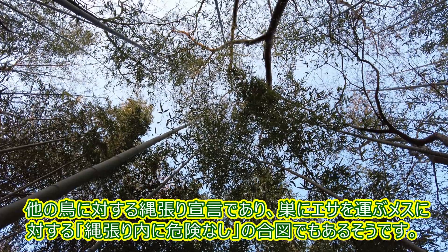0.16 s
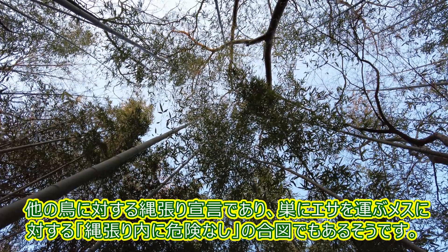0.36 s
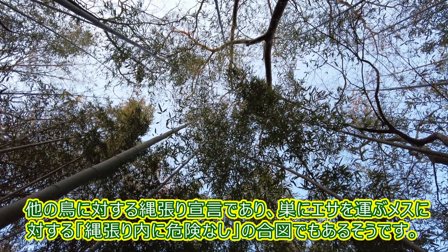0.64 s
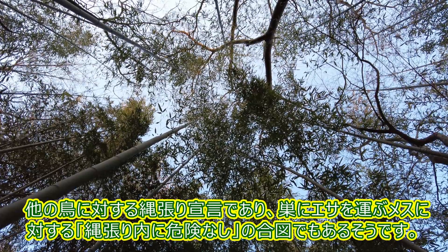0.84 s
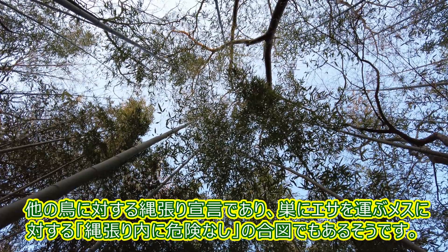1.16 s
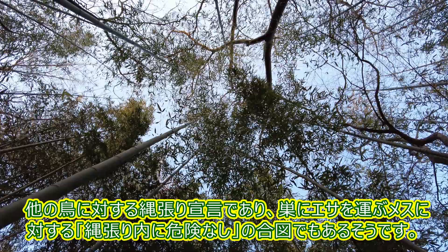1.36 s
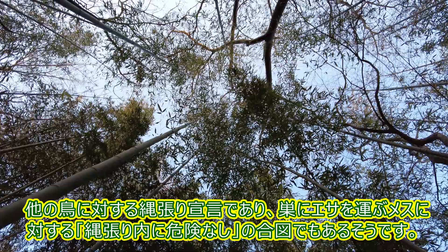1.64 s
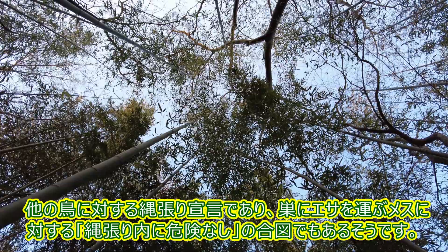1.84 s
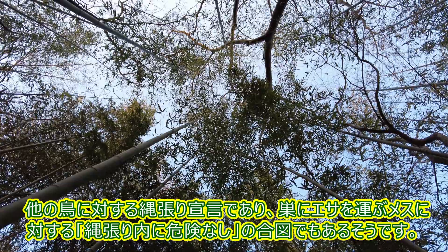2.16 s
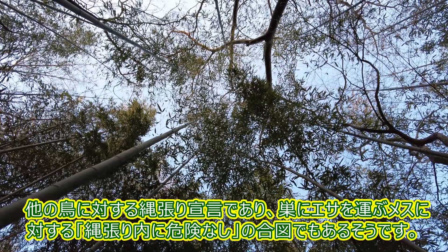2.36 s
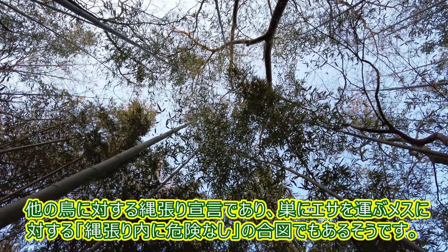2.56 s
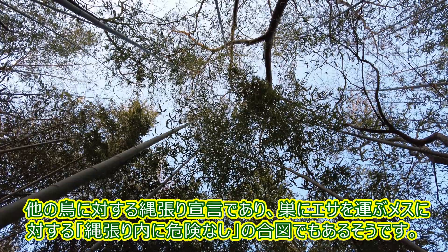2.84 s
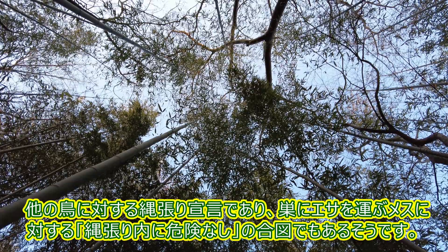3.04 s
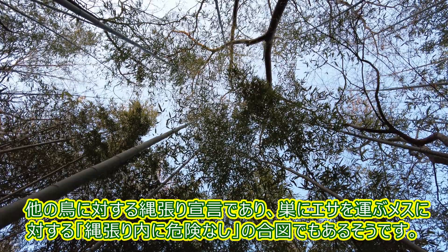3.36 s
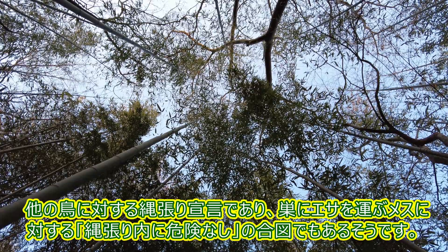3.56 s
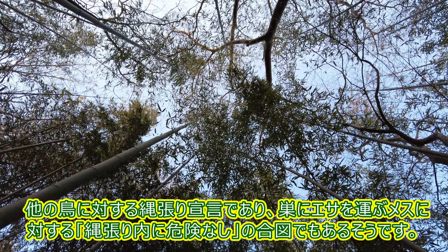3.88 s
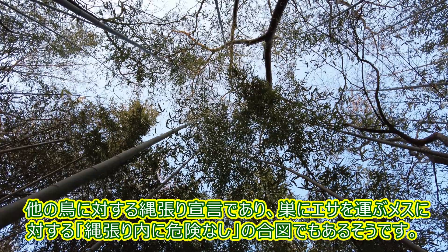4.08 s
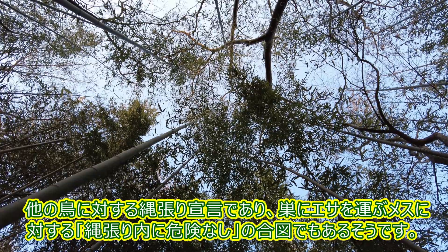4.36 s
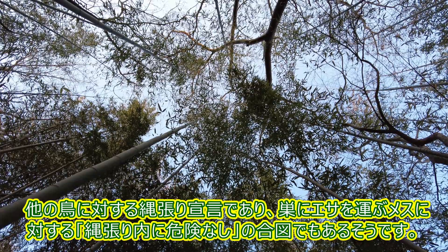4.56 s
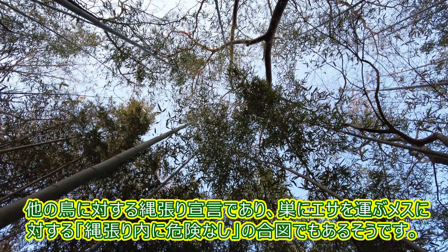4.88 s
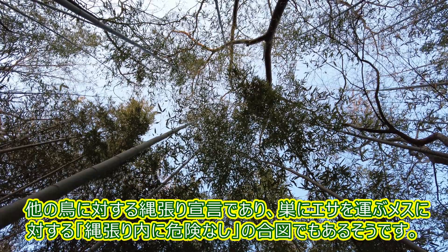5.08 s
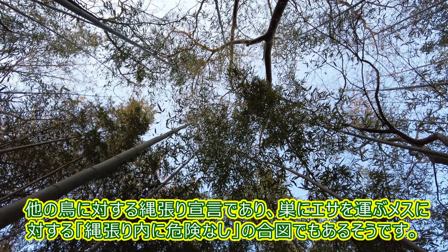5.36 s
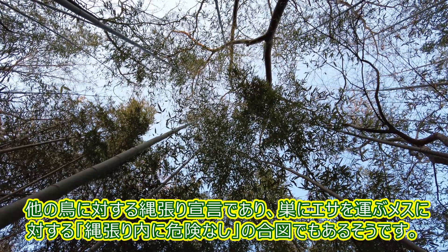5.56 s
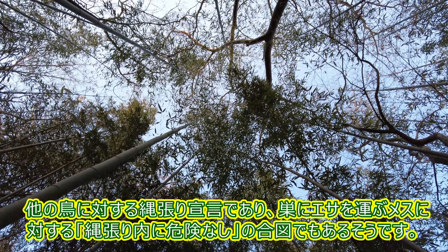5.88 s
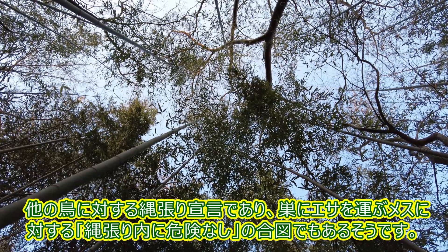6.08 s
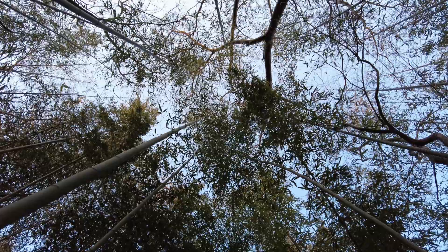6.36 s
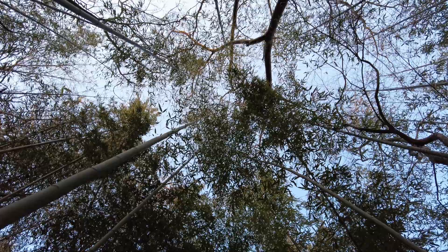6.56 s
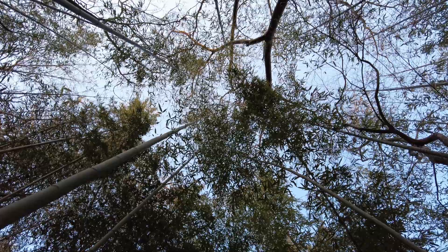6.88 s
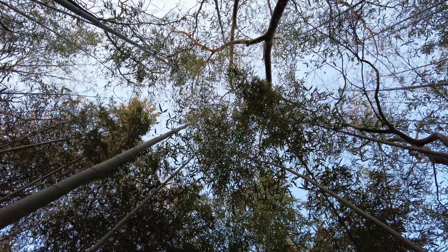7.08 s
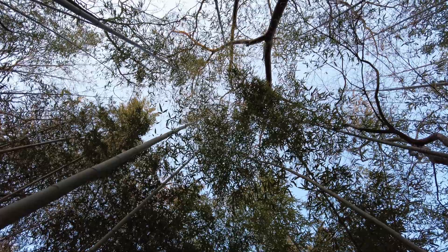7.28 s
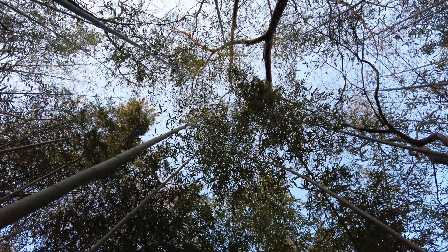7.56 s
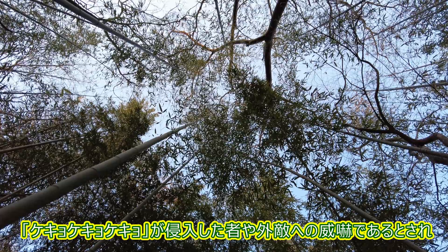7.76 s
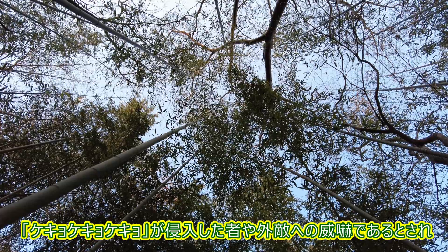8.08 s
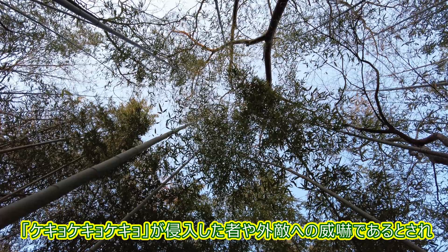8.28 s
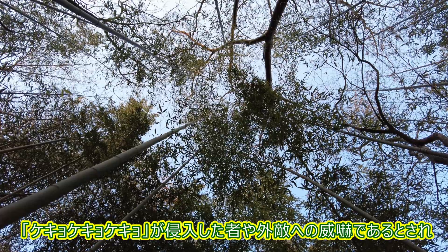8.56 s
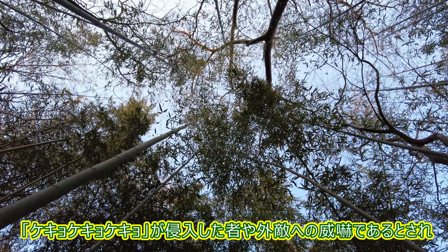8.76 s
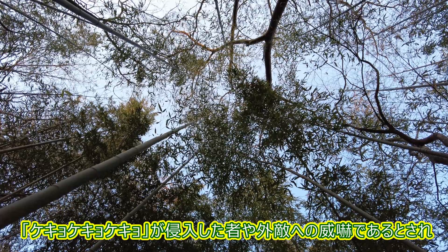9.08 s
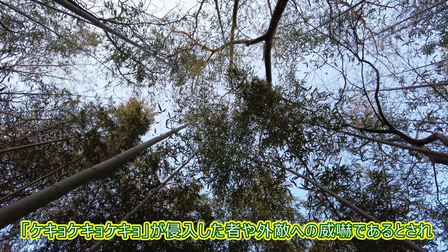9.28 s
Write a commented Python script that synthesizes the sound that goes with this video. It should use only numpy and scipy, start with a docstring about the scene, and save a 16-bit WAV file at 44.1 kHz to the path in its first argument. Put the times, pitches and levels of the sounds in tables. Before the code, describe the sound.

Wind buffets the microphone with a low rumble while leaves rustle softly among bamboo and trees. A faint bird whistles far off and small birds chirp, slightly to the left. A few hollow bamboo knocks follow, the last sharp and loud. Then a songbird gives a wavering whistle that grows louder and breaks into a fast, briefly echoing flourish, leaving light chirps and twitter.

```python
"""Warbler in a breezy bamboo grove

A warbler whistles a long, wavering note and a quick flourish; a second one sings further off.
Small birds chirp in the crowns and hollow stems knock together; the trunks scatter it all into
a short tail. Underneath, wind rumbles on the microphone over a bed of rustling leaves."""
import sys
import numpy as np
from scipy import signal
from scipy.fft import rfft, irfft, next_fast_len
from scipy.io import wavfile
from scipy.ndimage import uniform_filter1d

SR = 44100
rng = np.random.default_rng(int(sys.argv[2]) if len(sys.argv) > 2 else 0)


def waveform_to_disk(signal):
    """Save audio, clipped to [-1, 1], as 16-bit WAV at the path in sys.argv[1]."""
    frames = np.transpose(np.atleast_2d(signal))
    scaled = np.clip(frames, -1, 1) * 32767
    samples = np.round(scaled).astype(np.int16)
    wavfile.write(sys.argv[1], SR, samples)


N = 415863

# the warbler's long note, sinking as it swells: time_s, pitch_hz, level_db
LONG_NOTE = [(3.935, 2017, -53), (4.003, 2010, -49), (4.031, 1928, -47), (4.087, 1979, -37.5),
             (4.151, 1948, -47), (4.167, 1950, -38), (4.201, 1925, -40.5), (4.273, 1864, -46),
             (4.283, 1853, -41), (4.349, 1843, -36), (4.399, 1799, -48), (4.457, 1812, -37),
             (4.469, 1802, -51), (4.483, 1820, -32), (4.491, 1797, -37.5), (4.543, 1762, -30.5),
             (4.559, 1813, -40), (4.601, 1825, -27), (4.671, 1802, -43), (4.715, 1778, -25.5),
             (4.723, 1805, -38), (4.747, 1800, -30), (4.791, 1756, -48), (4.797, 1770, -51)]
# its flourish, one list a note: time_s, pitch_hz, level_db
FLOURISH_NOTES = [
    [(4.806, 1790, -25), (4.824, 1287, -34.5), (4.834, 1510, -32), (4.843, 1870, -24.5), (4.856, 1780, -22)],
    [(4.886, 2290, -38), (4.895, 2558, -21.5), (4.905, 2364, -24), (4.916, 2100, -19)],
    [(4.975, 2830, -31), (4.984, 3235, -28.5), (4.993, 3325, -23), (4.997, 4000, -31)],
    [(4.997, 3500, -21), (5.003, 2476, -23.5), (5.011, 2195, -20.5), (5.022, 2346, -24), (5.032, 2500, -28)],
    [(5.038, 2380, -33), (5.045, 1927, -23), (5.054, 1275, -45), (5.064, 1320, -41), (5.076, 1462, -32),
     (5.095, 1454, -32), (5.11, 1460, -60)],
]
# stem hits: start_s, gain_db, pan_left_db, wet_share, strike_hz, ring_factor, scrape_s, snap_db, low_cut_hz
STEM_HITS = [(.480, -42, .1, .5, 6000, 1.1, .002, 6, 1300),
             (2.886, -21.5, 1.3, .35, 3000, 1.9, .018, -1, 850),
             (3.068, -27, .1, .15, 2900, .8, .002, -14, 2300),
             (3.7937, -9.5, 2.5, .33, 1950, .5, .0025, -3, 1400)]
# the ring of a hollow stem: pitch_hz, gain_db, base_t60_s
STEM_MODES = [(900, -5, .05), (1320, -1, .04), (1710, 0, .03), (2050, -3, .03), (2256, -1, .05),
              (2762, 0, .05), (2985, -2, .04), (3090, 0, .04), (3370, -6, .03), (4300, -6, .03),
              (4700, -6, .04), (5230, -9, .03), (5735, -2, .04)]
# steady whistles further off: start_s, length_s, pitch_hz, level_db, peak_at_share
FAR_WHISTLES = [(0.9, 0.38, 2262, -47.5, 0.8), (1.28, 0.073, 2003, -45, .2), (1.394, .12, 2280, -51, .1),
                (1.38, 0.054, 2675, -44.5, .3), (1.476, 0.072, 2700, -44.5, .5), (1.58, .06, 1900, -48, .2),
                (3.305, 0.028, 3080, -48.5, 0.1), (3.948, 0.91, 1251, -55, 0.2),
                (7.118, 0.068, 4630, -50, .1), (7.41, .07, 4100, -56, .45), (8.478, 0.18, 4100, -56, .3)]
# sliding chirps; a bend under 1 slides early, distance runs from 0 (near) to 1 and beyond (far):
# start_s, length_s, from_hz, to_hz, bend, level_db, peak_at_share, distance
CHIRPS = [(1.553, .014, 2640, 4200, .9, -43, .6, .4), (1.567, .075, 4200, 4950, 1.5, -41.5, .5, .5),
          (1.642, .04, 4950, 5800, .6, -41.5, .4, .6), (1.565, .015, 2710, 1930, 1.1, -43, .2, .3),
          (1.692, .018, 3230, 2600, .6, -45, .2, .1), (1.74, .05, 2850, 3900, 2.2, -41, .45, .95),
          (2.068, .012, 2450, 3400, .6, -37.5, .6, 1.4), (2.158, .12, 3950, 5350, .6, -41.5, .2, .95),
          (2.34, .08, 5650, 6400, .5, -51, .5, .9), (2.37, .06, 3900, 5100, 1.1, -50, .3, .95),
          (2.515, .085, 4000, 4600, 1.1, -40, .4, .5), (2.6, .07, 4650, 5200, .35, -44.5, .4, .7),
          (2.12, .035, 6650, 6700, 1, -53, .5, .5), (2.685, .027, 3400, 2450, 1.1, -42, .8, .3),
          (2.712, .075, 2450, 3550, .55, -42, .15, .4), (3.02, .04, 6300, 6700, .6, -53, .3, .9),
          (3.618, .068, 2550, 4030, .9, -44, .4, .3), (3.68, .11, 4000, 4460, .6, -43, .4, .4),
          (3.915, .18, 2950, 3880, .55, -44, .2, .45), (4.255, .07, 2350, 2700, .4, -44, .4, .8),
          (4.35, .05, 2700, 3000, .7, -46, .7, .6), (4.41, .06, 2840, 3550, .6, -51, .4, .9),
          (5.782, .025, 2500, 3350, .4, -45, .7, .4), (5.807, .04, 3350, 2500, 1.6, -45.5, .3, .35),
          (5.815, .02, 11400, 10500, 1.1, -51, .6, .3), (6.088, .08, 2780, 3520, .52, -41.5, .6, .4),
          (6.163, .035, 3450, 1900, 1.2, -47.5, .2, .4), (6.198, .08, 1900, 1500, .4, -46, .5, .7),
          (6.79, .016, 2800, 4000, .9, -49, .8, .3), (6.804, .068, 4000, 5600, .75, -32.5, .26, .02),
          (7.065, .045, 7000, 5900, .5, -51, .7, .9), (7.2, .095, 4700, 3850, 1.6, -45, .2, .7),
          (7.492, .095, 3600, 5650, .65, -39, .45, .8), (8.92, .09, 4100, 4600, .8, -46, .7, .99),
          (9.01, .13, 5100, 5900, .8, -48, .3, .95), (9.26, .06, 2480, 3600, .6, -49, .2, .95)]
# the far flock's twitter: time_s, note_level_db
TWITTER_LEVELS = [(0, -56), (.5, -54), (.75, -82), (1.5, -55), (2.2, -50.5), (2.7, -54), (3.5, -84),
                  (5.6, -65), (6.6, -54), (7.2, -58), (7.8, -51), (8.3, -67), (9, -52), (9.43, -53)]
# gusts on the microphone: time_s, level_db
GUST_LEVELS = [(0.0, -31), (0.34, -35), (0.66, -27), (1.47, -31.5), (3.65, -30), (3.83, -37), (3.91, -28.5),
               (5.7, -32.5), (9.43, -31.5)]
# tone of their rumble: frequency_hz, gain_db
RUMBLE_EQ = [(7.1, -39), (12, 3), (62, 3), (73, -4.5), (87, -9.5), (102, -9.5), (200, -46), (260, -82),
             (440, -120)]
# the breeze riding the leaf bed: time_s, gain_db, treble_db
BREEZE_RIDE = [(0.0, -55, 1.3), (1.42, -50.5, -1), (5.25, -51.5, -1.3), (5.78, -52, -0.5),
               (9.43, -49.5, -2)]
# tone of the leaves in the centre: frequency_hz, gain_db
LEAF_MID_EQ = [(71, -7), (120, -3), (209, -11), (321, -13), (385, -18.5), (630, -16), (698, -17),
               (968, -17.5), (1260, -13), (1720, -14.5), (2380, -19), (6110, -22.5), (11500, -30),
               (15000, -29.5), (16000, -27.5)]
# tone of the leaves at the sides: frequency_hz, gain_db
LEAF_SIDE_EQ = [(24, -28), (40, -2), (363, -16.5), (1090, -5), (2980, -14), (3650, -15), (4340, -12.5),
                (4930, -14.5), (5310, -24), (5870, -17), (11000, -24.5), (11800, -29.5), (16000, -20.5)]
# rustle bands, the mids riding the breeze most: low_hz, high_hz, breeze_share, flicker_db, pan_left_db
LEAF_BANDS = [(30, 300, .091, .6, .3), (300, 480, .16, 1.6, .5), (480, 750, .3, 1.9, 1.3),
              (750, 1180, .84, 1.7, 2), (1180, 1600, .83, 1, .5), (1600, 2200, .94, .9, -.3),
              (2200, 4000, .88, .5, 0), (4000, 8000, .49, .4, -.5), (8000, 12000, .22, .5, -.2),
              (12000, 17000, .26, .6, -1.5)]


def warbler(bus, air):
    """The lead voice: a nearly dry long note, then a wetter flourish."""
    place(bus, whistle(LONG_NOTE, air, scatter=.15), LONG_NOTE[0][0], pan_db=0, wet=.12)
    for contour in FLOURISH_NOTES:
        place(bus, whistle(contour, air, scatter=.49), contour[0][0], pan_db=0, wet=.34)


def whistle(contour, flutter, scatter):
    """A pure tone that beats as paths through moving leaves shift in phase; returns direct and send."""
    times_s, hz, db = np.transpose(contour)
    t = np.arange(times_s[0], times_s[-1], 1 / SR)
    fades = np.clip(np.minimum(t - times_s[0], times_s[-1] - t) / .003, 0, 1)
    paths = (1 + scatter * flutter[int(times_s[0] * SR):][:len(t)]) / np.sqrt(1 + 2 * scatter ** 2)
    tone = np.exp(2j * np.pi * np.cumsum(np.interp(t, times_s, hz)) / SR)
    return np.sqrt(2) * fades * undb(np.interp(t, times_s, db)) * np.imag([paths * tone, tone])


def stem_knock(db, strike_hz, ring_factor, scrape_s, snap_db, low_cut_hz):
    """A scraping blow gives a hollow body and a bright snap; modes near the strike pitch ring most."""
    t = np.arange(SR // 10) / SR
    contact = rng.standard_normal(len(t)) * np.exp(-t / scrape_s) * np.clip(t / .0027, 0, 1)
    contact[int(.0022 * SR)] += 4.5  # the blow lands just after first touch
    snap = signal.sosfilt(signal.butter(3, [1560, 6100], "bandpass", fs=SR, output="sos"), contact)
    ring = 0
    for hz, mode_db, t60_s in STEM_MODES:
        struck_db = mode_db - 7 * np.log2(hz / strike_hz) ** 2
        ring += undb(struck_db - 60 * t / (ring_factor * t60_s)) * np.sin(2 * np.pi * hz * t)
    body = signal.fftconvolve(contact, ring)[:len(t)]
    # the slimmer the stem, the less bass it radiates
    body = signal.sosfilt(signal.butter(4, low_cut_hz, "highpass", fs=SR, output="sos"), body)
    body *= np.linalg.norm(contact) / np.linalg.norm(body)
    return undb(db) * body, undb(db + snap_db) * snap


def glide(start_s, length_s, from_hz, to_hz, bend, db, peak_at, start_db=-4, end_db=-6):
    """Contour of a bird note that slides in pitch, swells to one peak and fades."""
    progress = np.linspace(0, 1, 24)
    hz = from_hz + (to_hz - from_hz) * progress ** bend
    swell_db = np.interp(progress, [0, peak_at, 1], [start_db, 0, end_db])
    return np.transpose([start_s + length_s * progress, hz, db + swell_db])


def twitter(count=600, length_s=.022, centre_hz=4338):
    """Contours for a faint, far flock: tiny random notes that blur together."""
    for k, (late, from_offset, to_offset, accent) in enumerate(rng.standard_normal((count, 4))):
        start_s = np.clip((k + late / 2) / count * N / SR, 0, N / SR - 1.1 * length_s)
        slide_hz = centre_hz * (1 + .06 * np.array([from_offset, to_offset]))
        db = np.interp(start_s, *np.transpose(TWITTER_LEVELS)) + 2 * accent
        yield glide(start_s, length_s, *slide_hz, bend=.847, db=db, peak_at=.57, start_db=-2, end_db=-2)


def other_birds(bus, air, crowns):
    """Whistles, chirps and twitter on the left; far calls cross more moving leaves and blur faster."""
    notes = []
    for start_s, length_s, hz, db, peak_at in FAR_WHISTLES:
        sag_hz = hz * 1.006, hz * .994
        notes.append((glide(start_s, length_s, *sag_hz, .79, db, peak_at, start_db=-9, end_db=-2), .05))
    notes += [(glide(*chirp), distance) for *chirp, distance in CHIRPS]
    notes += [(contour, 1) for contour in twitter()]
    for contour, distance in notes:
        call = whistle(contour, crowns if distance > .42 else air, scatter=.3 + .8 * distance)
        place(bus, call, contour[0][0], pan_db=4, wet=.55 + .27 * distance)


def trunk_reverb(send, low_t60_s=.56, treble_t60_s=.46, bloom_s=.008):
    """Countless trunks scatter the sound into a dense stereo tail that loses its treble first."""
    t = np.arange(SR) / SR
    echoes = rng.standard_normal((2, SR))
    lows = signal.sosfilt(signal.butter(2, 3500, fs=SR, output="sos"), echoes)
    tail = lows * undb(-60 * t / low_t60_s) + (echoes - lows) * undb(-60 * t / treble_t60_s)
    tail *= 1 - np.exp(-(t / bloom_s) ** 2)
    return signal.fftconvolve(send[None], tail / np.sqrt(np.sum(tail ** 2) / 2), axes=1)[:, :N]


def grove(bus, right_lag_s=55e-6):
    """The space: direct sound reaches the right ear a touch late, and the trunks add their tail."""
    left, right, send = bus
    size = next_fast_len(N)
    hz = np.arange(size // 2 + 1) * SR / size
    right = irfft(rfft(right, size) * np.exp(-2j * np.pi * hz * right_lag_s), size)[:N]
    # swaying stems blend two sets of echo paths, so the tail never rings on fixed pitches
    sway = 1.5 * np.array([wander(130), wander(130)])
    return np.array([left, right]) + np.cos(sway) * trunk_reverb(send) + np.sin(sway) * trunk_reverb(send)


def wind_rumble():
    """Eddies on the microphone: a mono rumble, each band buffeting on its own."""
    bands = noise_bands(RUMBLE_EQ, [(5, 35), (35, 55), (55, 75), (75, 220)])
    rumble = sum(band * undb(1.36 * wander(2.63)) for band in bands)
    return rumble / np.sqrt(np.mean(rumble ** 2)) * undb(automation(GUST_LEVELS)[0])


def leaf_rustle(mid_db=8, side_db=4.5):
    """A wide bed of leaves: noise bands swell with the breeze, stir together and flicker alone."""
    breeze_db, treble_db = automation(BREEZE_RIDE)
    mean_db = np.mean(breeze_db)
    stir_db = .6 * wander(18) + .3 * wander(8)
    mids, sides = noise_bands(LEAF_MID_EQ, LEAF_BANDS), noise_bands(LEAF_SIDE_EQ, LEAF_BANDS)
    mid_gain, side_gain = undb(mid_db) / np.std(sum(mids)), undb(side_db) / np.std(sum(sides))
    bed = np.zeros((2, N))
    for mid, side, (low_hz, _, breeze_share, flicker_db, pan_db) in zip(mids, sides, LEAF_BANDS):
        db = mean_db + breeze_share * (breeze_db - mean_db) + flicker_db * wander(14)
        db += (low_hz > 2000) * treble_db + (low_hz > 400) * stir_db
        stereo = mid_gain * mid + side_gain * np.outer([1, -1], side)
        bed += undb(db) * stereo * undb([[pan_db / 2], [-pan_db / 2]])
    return bed


def undb(db):
    """Decibels to gain."""
    return 10 ** (np.asarray(db) / 20)


def automation(rows):
    """Straight ramps through a table's breakpoints, one curve for each column after time."""
    times_s, *columns = np.transpose(rows)
    return [np.interp(np.arange(N) / SR, times_s, column) for column in columns]


def wander(rate_hz):
    """A random modulator: held steps, smoothed twice, with a spread near 1."""
    hold = int(SR / rate_hz)
    steps = np.repeat(rng.standard_normal(N // hold + 1), hold)
    return 1.46 * uniform_filter1d(uniform_filter1d(steps, hold), hold)[:N]


def noise_bands(eq, bands):
    """Noise shaped by an EQ curve and split into bands."""
    size = next_fast_len(N)
    hz = np.arange(1, size // 2 + 2) * SR / size
    eq_hz, eq_db = np.transpose(eq)
    spectrum = rfft(rng.standard_normal(size)) * undb(np.interp(np.log(hz), np.log(eq_hz), eq_db))
    return [irfft(spectrum * (hz >= low) * (hz < high), size)[:N] for low, high, *_ in bands]


def place(bus, sound, start_s, pan_db, wet):
    """Pans a (direct, send) pair onto the bus; wet is the share of power sent to the trunks."""
    direct, send = sound
    start = int(start_s * SR)
    left, right = np.sqrt(1 - wet) * undb([pan_db / 2, -pan_db / 2])
    feeds = np.array([left * direct, right * direct, np.sqrt(wet) * send])
    bus[:, start:start + len(direct)] += feeds[:, :N - start]


def scene():
    """Birds and knocks in the grove, over wind and leaves."""
    bus = np.zeros((3, N))  # left, right, reverb send
    air = wander(70) + 1j * wander(70)  # flutter of the paths through moving leaves
    crowns = wander(240) + 1j * wander(240)
    warbler(bus, air)
    for start_s, db, pan_db, wet, *blow in STEM_HITS:
        body, snap = stem_knock(db, *blow)
        place(bus, (body, body), start_s, pan_db, wet)
        place(bus, (snap, snap), start_s, pan_db, wet=1)
    other_birds(bus, air, crowns)
    return grove(bus) + wind_rumble() + leaf_rustle()


def record(dry):
    """A steep low-pass trims the very top of the mix."""
    return signal.sosfilt(signal.ellip(12, .2, 80, 15780, fs=SR, output="sos"), dry)


dry = scene()
out = record(dry)
waveform_to_disk(out)
```